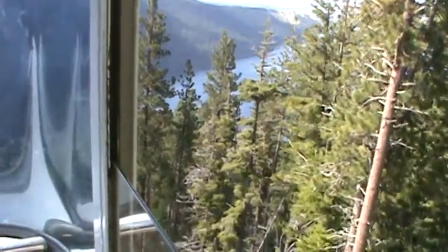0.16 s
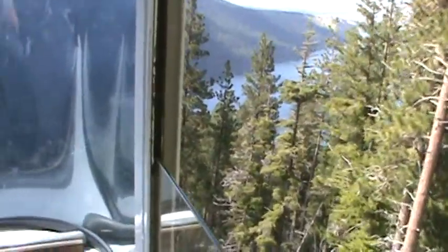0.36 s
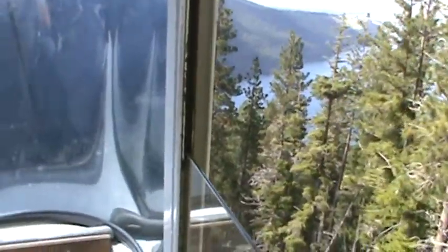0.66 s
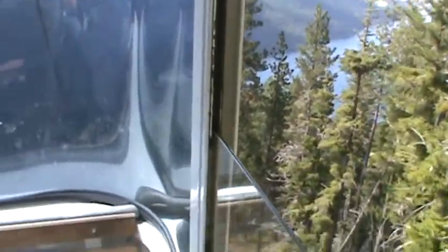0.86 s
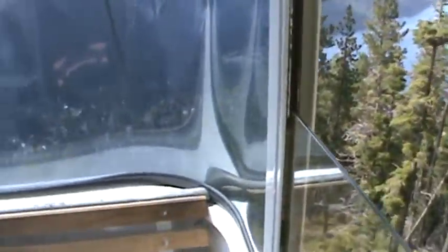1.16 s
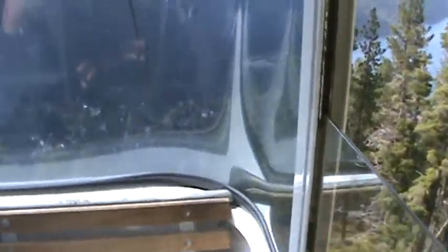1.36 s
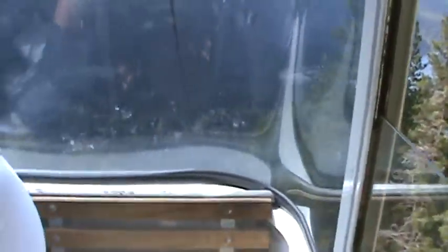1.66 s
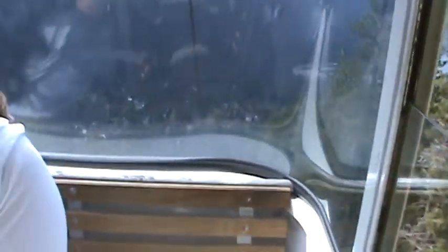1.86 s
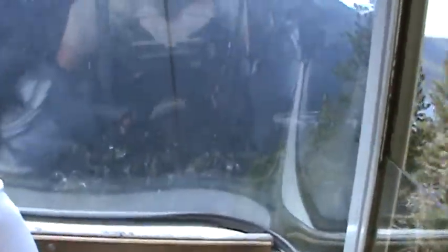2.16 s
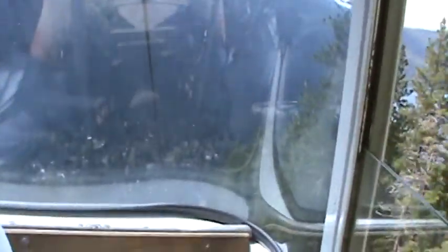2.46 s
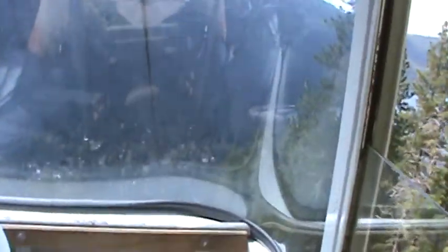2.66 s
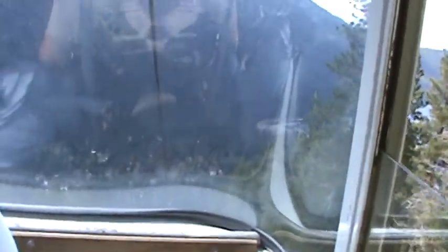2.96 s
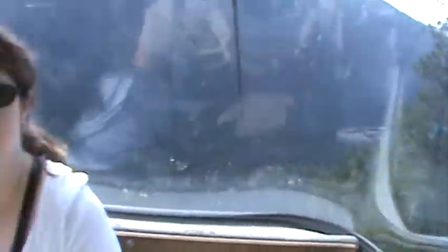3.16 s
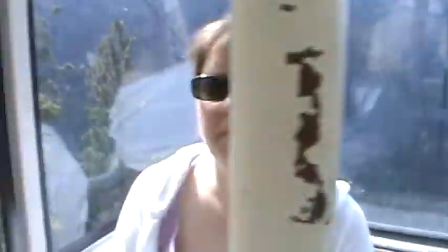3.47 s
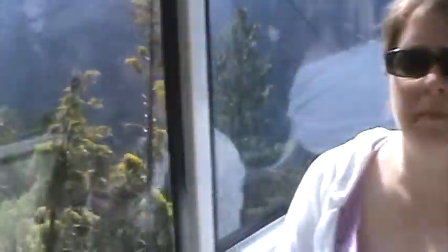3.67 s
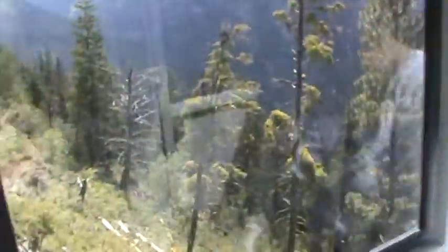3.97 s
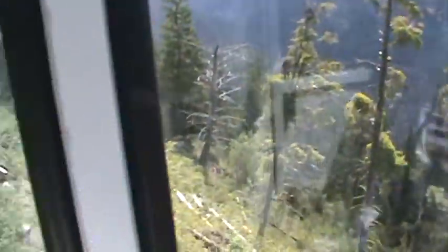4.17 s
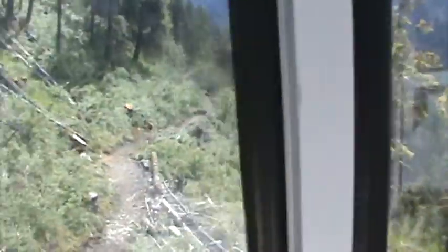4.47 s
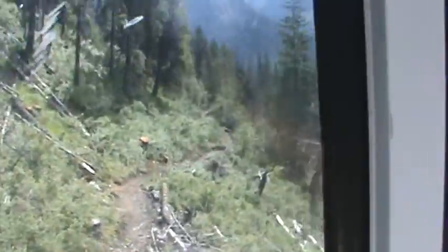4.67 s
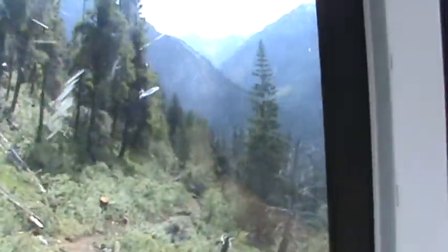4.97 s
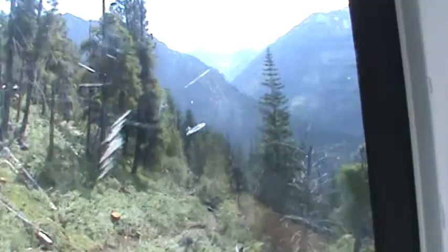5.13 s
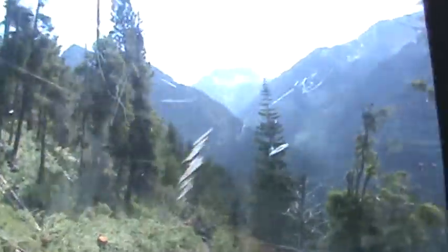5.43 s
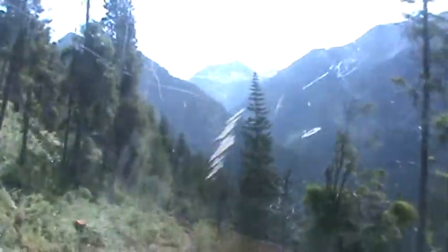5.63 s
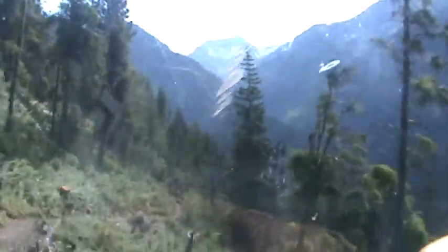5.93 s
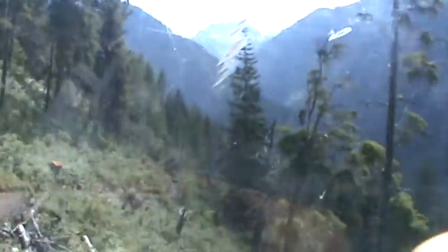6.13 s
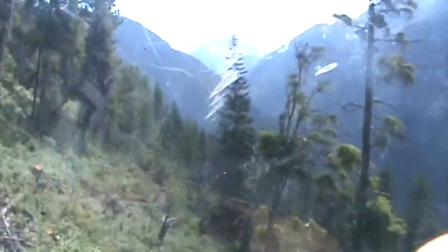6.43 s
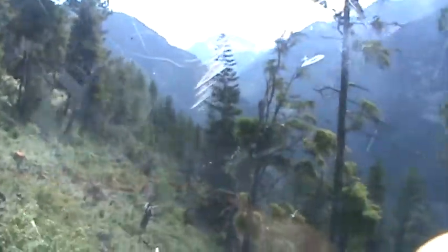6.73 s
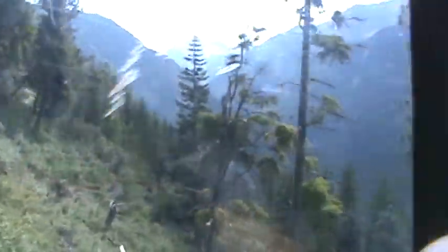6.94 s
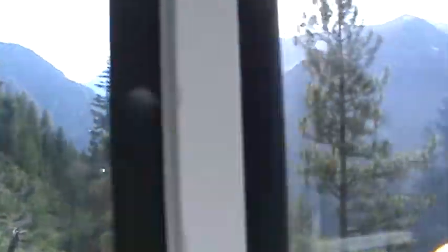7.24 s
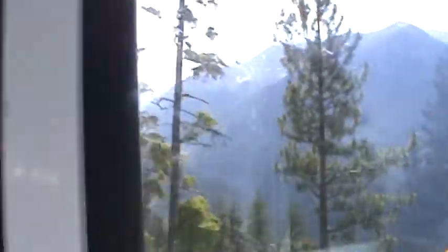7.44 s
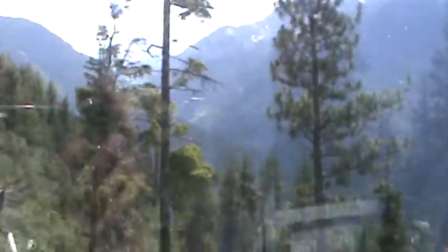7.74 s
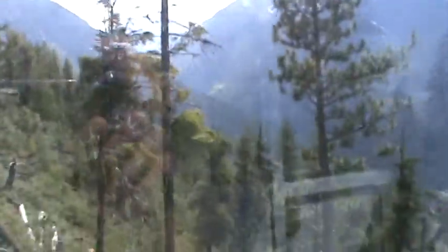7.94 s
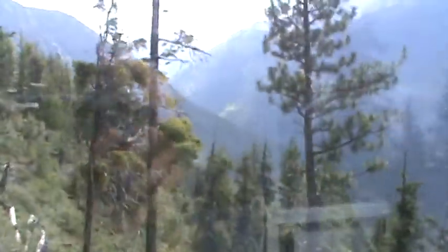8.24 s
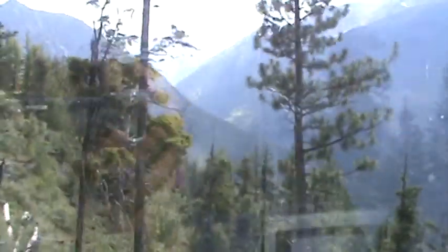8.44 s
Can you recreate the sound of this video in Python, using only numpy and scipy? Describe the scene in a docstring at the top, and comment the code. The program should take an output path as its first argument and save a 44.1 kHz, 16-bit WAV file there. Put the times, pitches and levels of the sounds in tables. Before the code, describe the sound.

A cable car booms and rumbles softly as it travels, heard from inside through a hand-held microphone over faint hiss. Scattered clicks and rattles come from loose fittings, growing busier until a jolt sets the panels clattering loudly midway. Clothes rustle, someone shuffles, and fingers knock close on the camera body. The low hum then pulses more heavily, with a second flurry of rattles, dull thuds and taps late on.

```python
"""Riding in a cable cabin

The cable shakes the cabin, which booms at its own low notes. Loose fittings rattle and make the wall
panels ring and thud, once in a loud clatter. We listen from a hand-held camera: fingers tap its casing,
and the holder shuffles and turns with a rustle of cloth. A soft rumble, hiss and whine lie underneath."""
import sys
import numpy as np
from scipy import signal
from scipy.fft import rfft, irfft, next_fast_len
from scipy.io import wavfile
from scipy.ndimage import uniform_filter1d

SR = 44100
rng = np.random.default_rng(int(sys.argv[2]) if len(sys.argv) > 2 else 0)


def wav_out(sig):
    """Save sig, one row per channel (or a flat mono array), as 16-bit PCM at SR to the path in sys.argv[1]."""
    wavfile.write(sys.argv[1], SR, np.round(np.clip(np.atleast_2d(sig).T, -1, 1) * 32767).astype(np.int16))


N = 379260
TIME = np.arange(N) / SR

# How hard the cable shakes the cabin. Each row: time in seconds, then levels in dB of the heave,
# the low note, the high note and the drone.
CABLE_SHAKE = [(0, -36, -47, -36, -36.5), (.6, -34, -24, -28.5, -37.5), (1.2, -24, -39.5, -38, -40),
               (1.9, -32.5, -30, -33, -41.5), (2.5, -35, -26.5, -38, -44.5), (3, -40, -28, -29, -38.5),
               (3.6, -39, -26.5, -28.5, -36), (4.15, -24, -28.5, -24.5, -32), (4.4, -31, -23, -30.5, -40),
               (4.6, -31, -24.5, -26, -28.5), (4.9, -24.5, -25.5, -27.5, -38.5),
               (5.3, -30.5, -24, -27, -35.5), (5.55, -35, -27.5, -24.5, -27.5),
               (6, -35, -25.5, -27.5, -43.5), (6.35, -33, -23, -30.5, -33), (6.7, -38, -22, -28, -38.5),
               (7.1, -29.5, -31.5, -28, -34.5), (7.45, -23, -17, -29.5, -36), (7.7, -29, -26, -25, -40.5),
               (8, -24, -24.5, -31.5, -35.5), (8.6, -38, -23.5, -30.5, -53)]
# The middle note, the strongest, swells and stops. Each row: time in seconds, level in dB.
MIDDLE_NOTE = [(0.0, -27.5), (0.29, -23.5), (0.36, -57), (0.48, -42), (1.39, -33.5), (1.7, -22.5),
               (1.77, -31.5), (2.92, -35.5), (4.17, -17.5), (4.26, -41), (4.41, -16.5), (4.58, -32),
               (5.05, -18.5), (5.31, -31), (5.53, -12), (5.87, -16), (6.03, -42), (6.2, -18), (6.35, -15.5),
               (6.47, -43), (6.54, -20.5), (6.9, -19.5), (6.97, -31), (7.52, -23), (7.57, -33.5),
               (7.81, -15.5), (8.07, -16.5), (8.17, -46), (8.29, -22), (8.6, -24.5)]
# Loose fittings. Each row: start in seconds, level in dB, pitch in Hz, panel share in dB,
# treble share in dB, fade time in seconds. A fade time (t60) is how long a sound takes to drop 60 dB.
FITTING_RATTLES = [(0.0223, -24, 3280, -8, -12.5, 0.15), (0.459, -40, 2130, 7.5, -37, .16),
                   (0.5747, -36, 2060, -4, -9, 0.056), (0.651, -21.5, 2930, -10.5, -7, .15),
                   (.7194, -36.5, 3050, -8, -26, 0.086), (1.3626, -22.5, 3540, -15.5, -10, 0.13),
                   (1.533, -36, 2220, -3.5, -23, .19), (1.6801, -46, 1800, -16, -25, 0.21),
                   (2.0522, -49, 1890, 10, -26, 0.071), (2.7405, -41, 4870, -18, -7.5, 0.098),
                   (3.064, -27, 2400, -4.5, -11.5, 0.15), (3.2104, -43.5, 2270, 9.5, -14, 0.12),
                   (3.3493, -44.5, 2350, 3, -23, 0.11), (3.4166, -50.5, 1850, 0, -2.5, .2),
                   (3.4795, -30.5, 3600, -8, -28, 0.13), (3.534, -38.5, 4220, 6.5, -10, 0.11),
                   (3.6255, -33, 3540, -24, -11.5, 0.14), (3.675, -39.5, 4660, -17, -27, .14),
                   (3.8165, -30, 2390, 3, -40, .2), (3.945, -32.5, 2200, 3, -38, 0.34),
                   (4.0, -38, 2000, 4.5, -25, 0.16), (4.117, -29, 2700, -15, -15.5, 0.11),
                   (4.1734, -22.5, 2940, 0.5, -23, 0.12), (4.3707, -30, 4770, -15, -15, 0.12),
                   (4.4154, -22, 4300, -6, -16, 0.2), (4.468, -14, 1850, -1, -11.5, .23),
                   (5.041, -37, 2150, 3.5, -29, 0.097), (5.2094, -41.5, 2540, 11, -8, 0.088),
                   (5.3477, -38, 2780, -18, -14, 0.12), (5.378, -33.5, 2580, 7.5, -38, 0.22),
                   (5.525, -27.5, 3100, 0, -8, 0.12), (5.6503, -31, 3160, -22, -20, 0.061),
                   (5.766, -34.5, 3950, -19, -12, 0.095), (5.824, -38, 1760, 4, -19, 0.11),
                   (5.853, -53.5, 3000, -5, 12, 0.058), (6.11, -44, 1870, 0, -16, 0.13),
                   (6.135, -42, 4000, -12, -17, 0.14), (6.2246, -38, 3360, -2, -32, 0.2),
                   (6.4027, -18, 3720, -14, -5, 0.14), (6.734, -35.5, 3770, -22, -21, 0.12),
                   (6.953, -33.5, 2330, 0.5, -41, .17), (7.1038, -33.5, 3520, -25, -26, 0.11),
                   (7.151, -28, 3600, -8.5, -20, 0.12), (7.194, -18.5, 3300, -5, -15.5, .21),
                   (7.222, -23, 2050, -5, -17, 0.11), (7.2935, -19, 2200, -28, -10, 0.096),
                   (7.467, -30, 1940, -3, -17, 0.1), (7.493, -30.5, 2110, -7, -9, 0.12),
                   (7.557, -28, 4320, -17, -9, 0.095), (7.638, -26.5, 4080, -9, -10.5, 0.14),
                   (7.689, -30.5, 2660, -60, -9, 0.18), (7.8005, -29, 2900, -10, -11.5, 0.094),
                   (7.8274, -35.5, 2310, 3, -24, 0.11), (7.875, -34, 2940, 3.5, -6.5, 0.15),
                   (7.939, -41, 1810, 5.5, -2, 0.14), (8.212, -39, 2510, 12, -25, 0.17)]
# The panel pitch heard most as the camera turns. Each row: time in seconds, pitch in Hz.
PANEL_PITCH = [(0, 520), (4.5, 610), (5, 860), (6.3, 620), (7.2, 900), (7.5, 660), (8.3, 840)]
# The notes the panels ring at. Each row: pitch in Hz, width in Hz, level in dB.
PANEL_NOTES = [(174.5, 10.4, -3), (203.7, 9.1, -6), (251.8, 10, -8.5), (292.6, 17, -12.5), (385, 8.1, -7),
               (440, 4.05, 0), (540.2, 6.3, -6.5), (640, 4.6, -24), (678, 5.8, -12), (773, 7.3, -7.5),
               (861, 7.4, -6.5), (933, 6.4, -9), (1030, 24, -18.5), (1178, 34, -14.5), (1426, 13, -13),
               (1560, 16, -7), (1833, 19, -12)]
# The loud clatter shaking the panels. Each row: time in seconds, level in dB.
CLATTER_LEVELS = [(4.43, -40), (4.474, -15.5), (4.526, -12.5), (4.604, -28.5), (4.632, -31.5), (4.794, -40),
                  (4.8, -45)]
# Blows on the frame during the clatter. Each row: start in seconds, level in dB.
FRAME_BLOWS = [(4.471, -10.5), (4.499, -14), (4.527, -6), (4.559, -19)]
# Fingers on the camera. Each row: start in seconds, level in dB, pitch in Hz, boost of all casing notes
# but the first in dB, click level in dB, left minus right in dB.
FINGER_TAPS = [(1.658, -30.5, 920, -6, -51, 7.5), (2.7, -35, 910, 5, -44, 1),
               (4.808, -7.5, 1085, 3.5, -37.5, 0.5), (4.989, -33.5, 1270, 4, -53, 3),
               (5.328, -32, 1090, 3, -35.5, -.5), (5.47, -24.5, 1410, -6, -40, 1),
               (5.63, -25.5, 986, 8, -31.5, -1), (5.653, -35, 1280, 3, -47, 5),
               (5.711, -38, 1090, 8, -39, -4), (5.731, -43, 1170, -3, -28, -9),
               (7.32, -18.5, 1150, -4, -17, -3), (7.402, -19.5, 1240, 0, -25, 1),
               (7.438, -16, 1166, -4, -15.5, -4)]
# The notes of the casing. Each row: multiple of the tap's pitch, level in dB, fade time in seconds.
CASING_NOTES = [(1.006, 8.5, 0.02), (0.678, -0.5, 0.037), (1.42, 1, 0.021), (2.16, -3, 0.0059)]
# Dull thuds in the panels under some rattles and the clatter.
# Each row: start in seconds, level in dB, pitch in Hz, fade time in seconds.
LOW_PANEL_THUDS = [(0.463, -36, 298, 0.28), (2.054, -32, 279, 0.31), (4.181, -20.5, 257, 0.25),
                   (4.54, -23.5, 180, 0.3), (5.382, -32, 320, 0.27), (6.965, -17.5, 288, 0.1),
                   (7.196, -23, 416, 0.27), (7.47, -23.5, 336, 0.2)]
# The holder moving. Each row: time in seconds, then levels in dB of rustle, its treble and shuffling.
HOLDER_MOVES = [(0, -62.5, -69, -52), (.93, -58.5, -69, -49), (1.6, -64, -70, -51.5),
                (2.06, -57, -66.5, -52), (2.49, -64.5, -69, -54.5), (3.3, -59.5, -68, -51.5),
                (3.83, -51.5, -63.5, -44.5), (4.14, -43, -53.5, -37), (4.45, -37, -46, -52),
                (4.66, -33, -41, -36), (4.8, -38.5, -44.5, -39), (4.88, -57.5, -71, -44.5),
                (5.05, -47.5, -58, -48), (5.2, -45, -53.5, -47), (5.3, -49.5, -60, -50),
                (5.46, -47, -62, -38.5), (5.8, -53.5, -60.5, -50), (6.11, -58, -68.5, -53.5),
                (6.8, -65, -72, -57.5), (7.02, -50.5, -60, -50.5), (7.3, -38.5, -51.5, -45),
                (7.6, -45.5, -54.5, -41.5), (8.17, -46, -55.5, -48.5), (8.6, -56, -63.5, -54.5)]

# The tone of each noise. Each row: frequency in Hz, relative level in dB.
RATTLE_TONE = [(530, -45), (900, -34), (1290, 6), (1460, 3), (2610, 3.5), (2870, 2), (4110, 4),
               (5320, -1.5), (7000, -32), (9100, -111), (15400, -120)]
RATTLE_TREBLE_TONE = [(3240, -27), (5500, 1.5), (7430, -3.5), (11500, -3.5), (15100, -17.5), (16400, -23)]
DRONE_TONE = [(110, -6), (150, -3), (250, -7), (340, -9.5), (420, -31), (520, -84)]
SHUFFLE_TONE = [(300, -50), (450, 5), (800, -0.5), (1500, -5.5), (2200, -9.5), (3000, -26)]
CLOTH_TONE = [(410, -35), (700, -11.5), (789, -13), (1310, -8.5), (1600, -7), (2470, -5), (4480, -5),
              (7500, -20), (9750, -42), (16500, -120)]
CLOTH_TREBLE_TONE = [(5000, -3), (6500, -10), (7500, -7), (9800, -1), (11500, -7), (13000, -10),
                     (15400, -16), (16400, -23)]
HEAVE_TONE = [(14, -9), (22, -6), (28, 8), (34, -23), (42, -25)]
RUMBLE_HISS_TONE = [(14, -20), (27, -2.5), (36, -3), (60, -7), (76, 0), (125, -4), (155, -26.5),
                    (300, -27.5), (550, -30.5), (1020, -40), (2790, -48), (4100, -58.5), (4750, -47.5),
                    (5400, -57), (15000, -57), (16400, -56.5)]
# A faint steady whine. Each row: pitch in Hz, level in dB.
WHINE_NOTES = [(850, -60), (1730, -70)]

# How alike left and right are, for sound from one place and for sound from all around.
# Each row: frequency in Hz, likeness (1 is the same, -1 or less is opposite).
LIKENESS_ONE_PLACE = [(60, 0.98), (130, 0.84), (300, 0.62), (640, 1), (1400, 0.61), (3100, 0.95),
                      (6800, 0.52), (15000, 0.53)]
LIKENESS_ALL_AROUND = [(60, 0.92), (150, 0.84), (380, -0.039), (950, -0.68), (2380, -1.24), (5980, -0.022),
                       (15000, 0.99)]
# Which side is louder. Each row: frequency in Hz, left minus right in dB.
BALANCE = [(60, -7), (180, -2), (550, 1), (1650, 1.0), (4970, 0.5), (15000, 0)]
# How far the left wave runs ahead of the right. Each row: frequency in Hz, lead in radians.
LEFT_LEAD = [(60, -0.03), (430, 1.28), (1400, 0.21), (3000, 0.36), (5000, 0.27), (9000, 0.32),
             (15000, -0.6)]


def boom(level_db, start_hz, end_hz, waver_hz, right_lead, fade_db, fades_per_s):
    """One cabin note. Its pitch and strength waver because the cable drives it at random."""
    hz = np.linspace(start_hz, end_hz, N) + waver_hz * wander(13.03)
    phase = 2 * np.pi * np.cumsum(hz) / SR
    fade = unit_level(gain_of(fade_db * uniform_filter1d(wander(fades_per_s), size=1500)))
    wave = np.sqrt(2) * np.sin([phase, phase + right_lead])
    return gain_of(level_db) * fade * pan(value_at(BALANCE, start_hz)) * wave


def rattles():
    """Loose fittings chatter briefly. Gives the sound in the air and the shaking sent to the panels."""
    air, frame = np.zeros((2, 2, N + SR))
    t = np.arange(SR // 3) / SR
    chatter = gain_of(1.7 * wander(120))
    tick, treble, white = (np.pad(chatter * stereo_noise(tone), [(0, 0), (0, SR)])
                           for tone in (band(RATTLE_TONE), band(RATTLE_TREBLE_TONE), np.ones_like))
    for start, db, hz, panel_db, treble_db, t60 in FITTING_RATTLES:
        span = slice(round(start * SR), round(start * SR) + len(t))
        rise_s = 0.0028 * (t60 / 0.12) ** 1.8  # a longer rattle starts more slowly
        tick_swell, treble_swell, panel_swell = (swell(t, db, rise_s * stretch, t60 * stretch)
                                                 for stretch in (1, 0.77, 1.44))  # treble dies first
        fitting = 0.5 * tick[:, span] + 0.13 * tuned(tick[:, span], hz, width_hz=2650)
        air[:, span] += tick_swell * fitting + gain_of(treble_db) * treble_swell * treble[:, span]
        panel_hz = np.interp(start, *np.transpose(PANEL_PITCH))
        frame[:, span] += gain_of(panel_db) * panel_swell * tuned(white[:, span], panel_hz, width_hz=630)
    return air[:, :N], frame[:, :N]


def panels(push, ring_db, direct_db):
    """The panels ring on after whatever shakes them; some sound comes straight through."""
    size = next_fast_len(N + SR // 2)
    hz = np.fft.rfftfreq(size, 1 / SR)
    rings = sum(gain_of(db) / (1 + 2j * (hz - pitch) / width) for pitch, width, db in PANEL_NOTES)
    return irfft(rfft(push, size) * (gain_of(ring_db) * rings + gain_of(direct_db)), size)[:, :N]


def clatter():
    """One heavy jolt shakes the panels with a burst of dull noise."""
    start, end = CLATTER_LEVELS[0][0], CLATTER_LEVELS[-1][0]
    gate = np.interp(TIME, [start - 0.02, start, end, end + 0.06], [0, 1, 1, 0])
    dull_noise = stereo_noise(lambda hz: hz / (hz + 150) / (1 + (hz / 680) ** 4))
    return gate * gain_of(curves(CLATTER_LEVELS)[0]) * dull_noise


def blows(push_s=0.0014):
    """Short soft pushes on the frame that set every panel ringing at once."""
    out = np.zeros(N)
    push = np.sin(np.pi * np.arange(0, push_s, 1 / SR) / push_s) ** 2
    for start, db in FRAME_BLOWS:
        out[round(start * SR):][:len(push)] += gain_of(db) * push
    return pan(2.0) * out


def taps():
    """A finger hits the camera: a click, a short ring of the casing and a tail of sound in the cabin."""
    out, t = np.zeros((2, N)), np.arange(8000) / SR
    lag = np.array([[0], [2.24]])  # the right side rings this many radians behind
    rise = np.minimum(t / 0.00098, 1)
    for start, db, hz, boost_db, click_db, pan_db in FINGER_TAPS:
        noise = rng.standard_normal((3, len(t)))
        ring = sum(gain_of(note_db + boost_db * (i > 0) - 60 * t / t60)
                   * np.sin(2 * np.pi * hz * multiple * t - lag)
                   for i, (multiple, note_db, t60) in enumerate(CASING_NOTES))
        tail = gain_of(-13.5 - 60 * t / 0.22) * tuned(noise[:2], 0.85 * hz, width_hz=900)
        click = gain_of(click_db - 60 * t / 0.01) * tuned(noise[2] + 0.3 * noise[:2], 3200, width_hz=6800)
        out[:, round(start * SR):][:, :len(t)] += pan(pan_db) * (gain_of(db) * (ring + tail) * rise + click)
    return out


def panel_thuds():
    """Dull thuds swell and fade in the panels under some rattles and the clatter."""
    out, t = np.zeros((2, N + SR)), np.arange(SR // 2) / SR
    white = np.pad(stereo_noise(np.ones_like), [(0, 0), (0, SR)])
    for start, db, hz, t60 in LOW_PANEL_THUDS:
        span = slice(round(start * SR), round(start * SR) + len(t))
        out[:, span] += swell(t, db, rise_s=0.006, t60=t60) * tuned(white[:, span], hz, width_hz=310)
    return out[:, :N]


def shuffling(level_db):
    """Shuffling on the floor and bench shakes the panels unevenly."""
    return gain_of(level_db + 2.2 * wander(6)) * stereo_noise(band(SHUFFLE_TONE))


def cloth(rustle_db, treble_db):
    """Cloth rubs in small uneven slips, so its rustle and treble flicker together."""
    slips = wander(36)
    return (gain_of(rustle_db + 1.14 * slips) * stereo_noise(band(CLOTH_TONE))
            + gain_of(treble_db + 0.95 * slips) * stereo_noise(band(CLOTH_TREBLE_TONE)))


def cable_drone(level_db):
    """The cable shakes the panels all the time with a low noise."""
    return gain_of(level_db + 1.8 * wander(9)) * stereo_noise(band(DRONE_TONE))


def cabin_echo(sound, t60, echo_db):
    """The hard little room adds scattered echoes that die fast."""
    delays = np.arange(100, 8000, 20) + rng.integers(0, 20, (2, 395))  # in samples
    strengths = rng.choice([-1., 1.], delays.shape[1]) * gain_of(-60 * delays / SR / t60)
    echoes = np.zeros((2, 8040))
    np.put_along_axis(echoes, delays, strengths, axis=1)
    echoes += 1.1 * echoes[::-1]  # each side also hears the other's echoes
    echoes /= np.linalg.norm(echoes[0])
    return sound + gain_of(echo_db) * signal.oaconvolve(sound, echoes, axes=1)[:, :N]


def background(heave_db):
    """The whole cabin heaving, steady cable rumble and microphone hiss, and a faint whine."""
    heave = gain_of(heave_db) * stereo_noise(band(HEAVE_TONE))
    rumble_hiss = gain_of(-29 + 0.59 * wander(8)) * stereo_noise(band(RUMBLE_HISS_TONE), LIKENESS_ALL_AROUND)
    whine = sum(gain_of(db) * np.sin(2 * np.pi * np.cumsum(hz + 5.5 * wander(17)) / SR)
                for hz, db in WHINE_NOTES)
    return heave + rumble_hiss + whine * [[1], [-1]]  # the whine's wave is flipped on the right


def gain_of(db):
    """Turns decibels into a number to multiply by."""
    return 10 ** (np.asarray(db) / 20)


def unit_level(x):
    """Scales a signal to an average (rms) level of 1."""
    return x / np.sqrt(np.mean(x ** 2) + 1e-20)


def swell(t, db, rise_s, t60):
    """A loudness curve that rises quickly and then dies away."""
    return (1 - np.exp(-t / rise_s)) * gain_of(db - 60 * t / t60)


def value_at(table, hz):
    """Reads between a table's rows, on a log frequency scale."""
    row_hz, values = np.transpose(table)
    return np.interp(np.log(hz + 1), np.log(row_hz + 1), values)


def curves(table):
    """Turns each column after the time into one value per sample."""
    times, *columns = np.transpose(table)
    return [np.interp(TIME, times, column) for column in columns]


def pan(db):
    """Left and right gains, with the left louder by db."""
    return gain_of(np.array([[0.5], [-0.5]]) * db)


def wander(speed_hz):
    """A smooth random drift of level 1."""
    steps_per_s = 400
    steps = rng.standard_normal(int(N / SR * steps_per_s) + 2)
    smooth = signal.lfilter([1], [1, -np.exp(-2 * np.pi * speed_hz / steps_per_s)], steps)
    return unit_level(np.interp(TIME * steps_per_s, np.arange(len(steps)), smooth))


def band(table):
    """Turns a tone table into a gain for each frequency, silent outside the table."""
    low_hz, high_hz = table[0][0], table[-1][0]
    return lambda hz: gain_of(value_at(table, hz)) * (hz > low_hz) * (hz < high_hz)


def stereo_noise(tone, likeness=LIKENESS_ONE_PLACE):
    """Noise of level 1 with the given tone, partly shared by left and right."""
    size = next_fast_len(N)
    hz = np.fft.rfftfreq(size, 1 / SR)
    a, b, c, d = rng.standard_normal((4, len(hz)))
    shared, separate = a + 1j * b, c + 1j * d
    alike = np.clip(value_at(likeness, hz), -1, 1)
    left = shared * np.exp(1j * value_at(LEFT_LEAD, hz))
    right = alike * shared + np.sqrt(1 - alike ** 2) * separate
    spectrum = np.array([left, right]) * tone(hz) * pan(value_at(BALANCE, hz))
    return unit_level(irfft(spectrum, size)[:, :N])


def tuned(noise, hz, width_hz):
    """Gives noise a rough pitch while keeping about the same level."""
    b, a = signal.iirpeak(hz, hz / width_hz, SR)
    return signal.lfilter(b, a, signal.lfilter(b, a, noise)) * np.sqrt(2 * SR / np.pi / width_hz)


def scene():
    """Adds up everything that reaches the microphone."""
    heave_db, low_db, high_db, drone_db = curves(CABLE_SHAKE)
    middle_db = curves(MIDDLE_NOTE)[0]
    rustle_db, treble_db, shuffle_db = curves(HOLDER_MOVES)
    booms = (boom(low_db, 47, 43.5, waver_hz=5.05, right_lead=0.92, fade_db=3.0, fades_per_s=5)
             + boom(middle_db, 92, 94, waver_hz=1.5, right_lead=0.8, fade_db=3.5, fades_per_s=1.2)
             + boom(high_db, 114, 117, waver_hz=6.42, right_lead=0.73, fade_db=4.5, fades_per_s=4.5))
    air_rattle, frame_rattle = rattles()
    shaking = frame_rattle + clatter() + panel_thuds() + shuffling(shuffle_db) + cable_drone(drone_db)
    return (booms + cabin_echo(air_rattle, t60=0.087, echo_db=-9.5)
            + panels(shaking, ring_db=8.5, direct_db=-4.0) + panels(blows(), ring_db=10.5, direct_db=-29)
            + taps() + cloth(rustle_db, treble_db) + background(heave_db))


def record(dry):
    """Clips peaks at full scale, then cuts the treble above 16000 Hz."""
    low_pass = signal.firwin(511, 16000, window=("kaiser", 9), fs=SR)
    return signal.oaconvolve(np.clip(dry, -1, 1), low_pass[None], "same")


dry = scene()
out = record(dry)
wav_out(out)
```